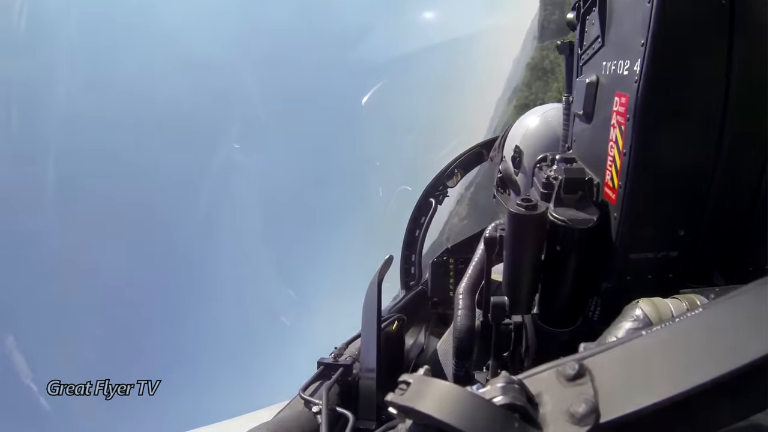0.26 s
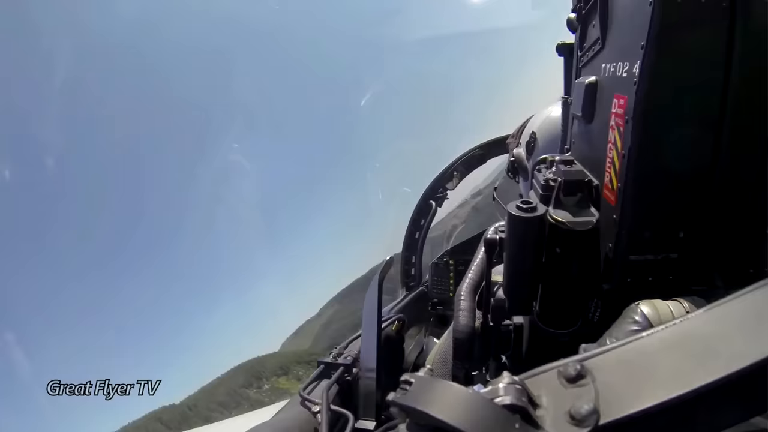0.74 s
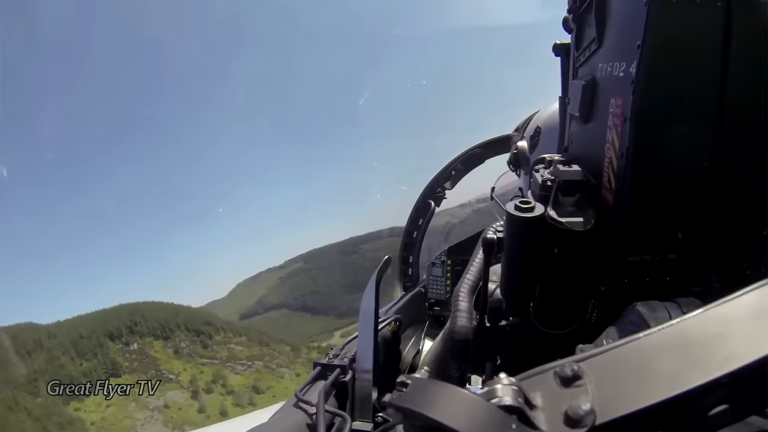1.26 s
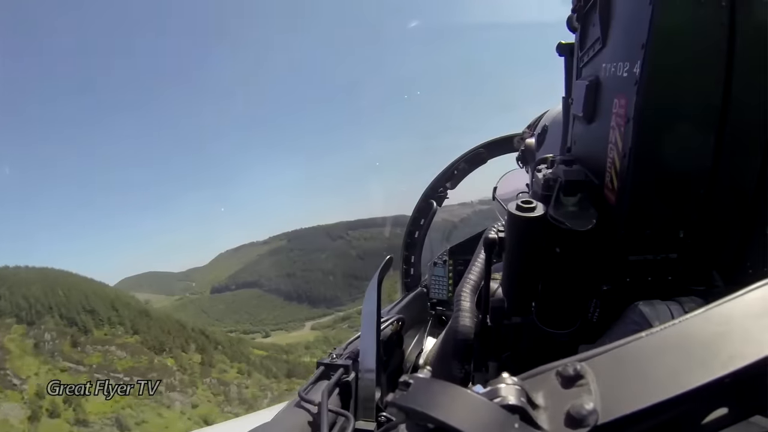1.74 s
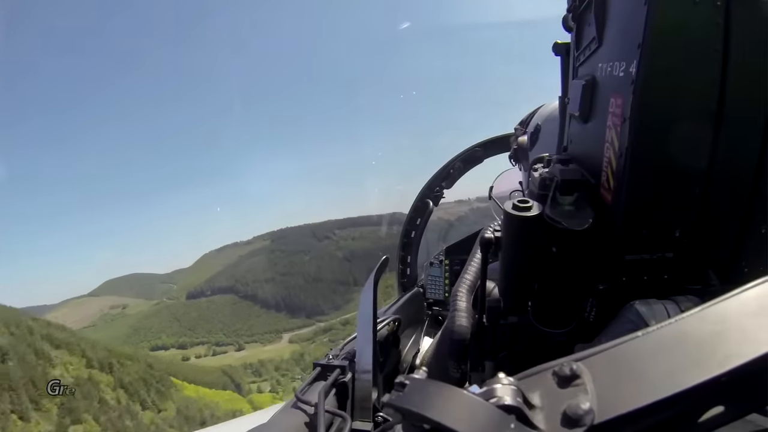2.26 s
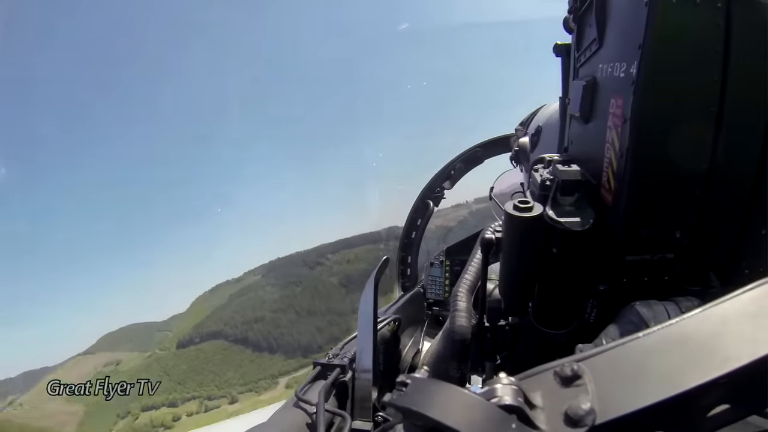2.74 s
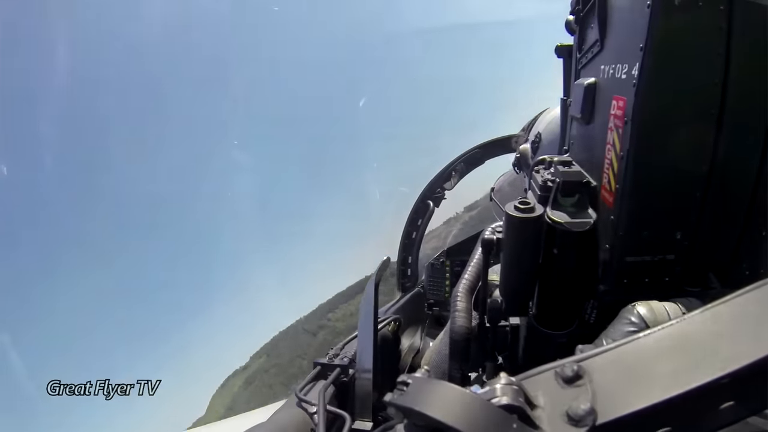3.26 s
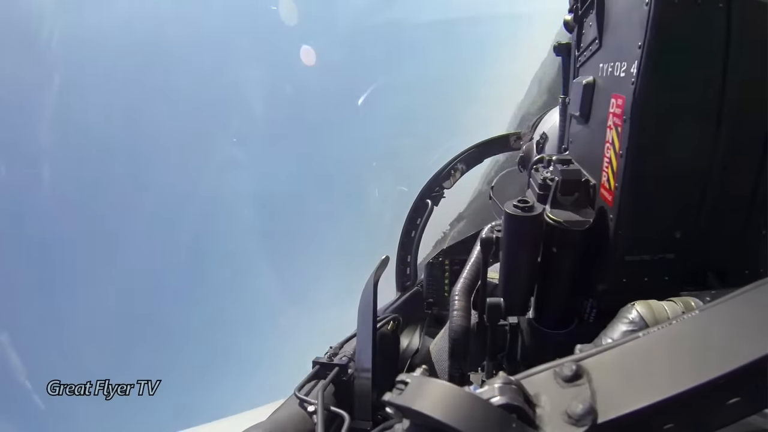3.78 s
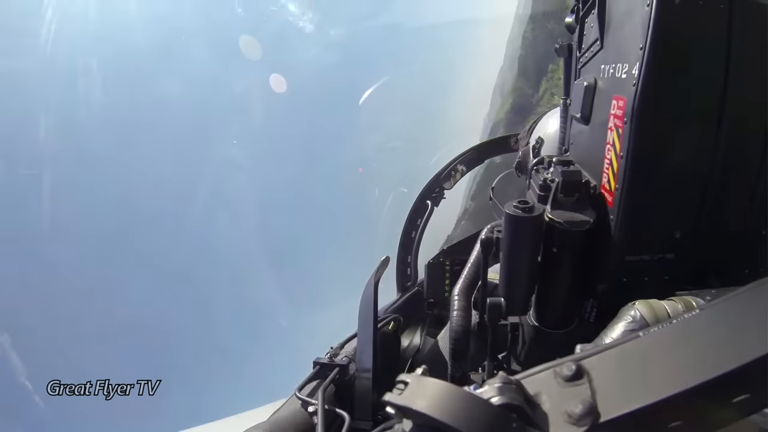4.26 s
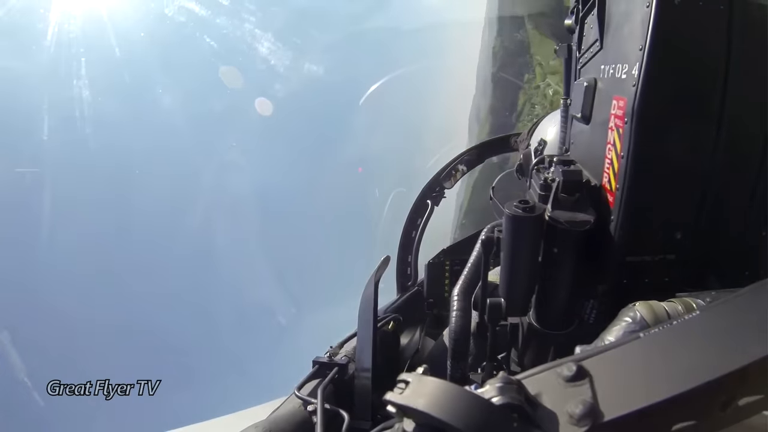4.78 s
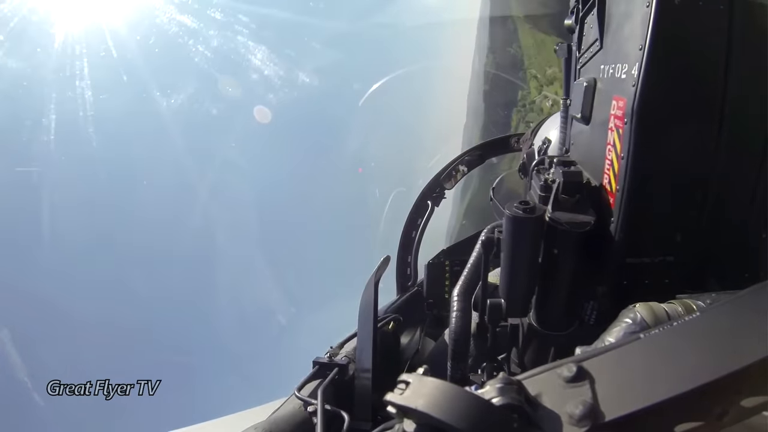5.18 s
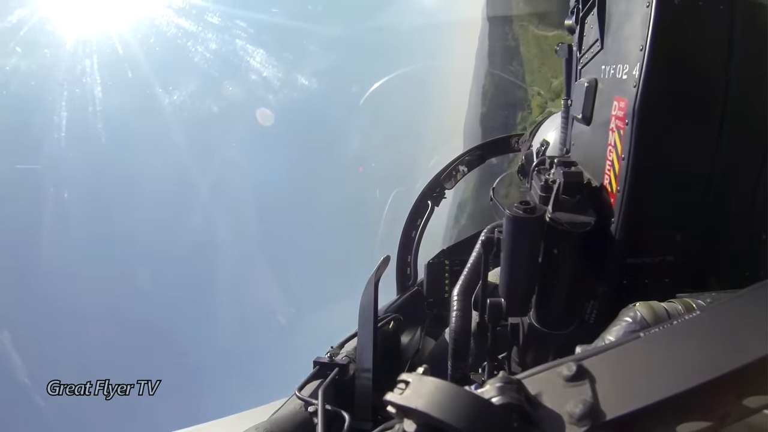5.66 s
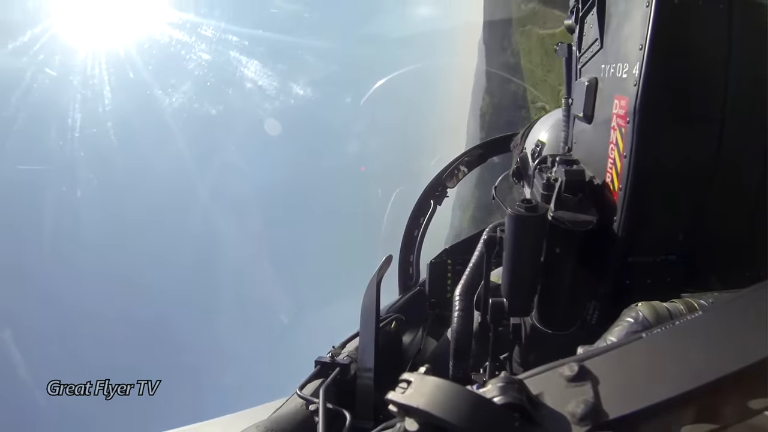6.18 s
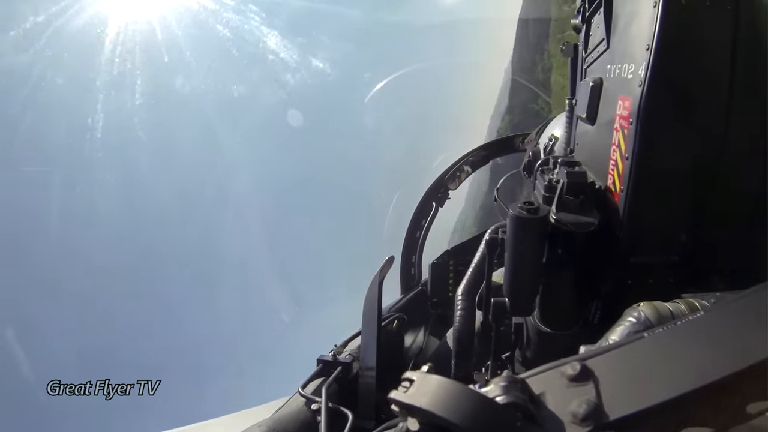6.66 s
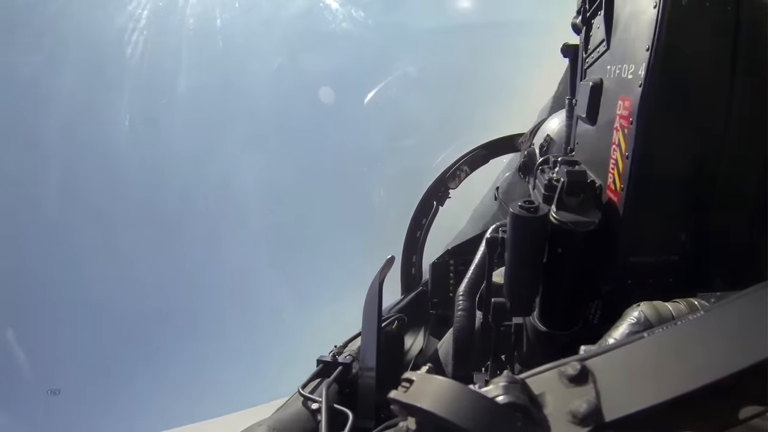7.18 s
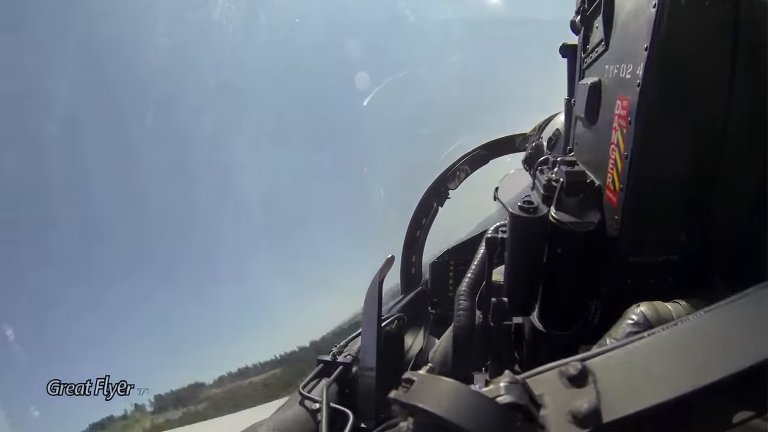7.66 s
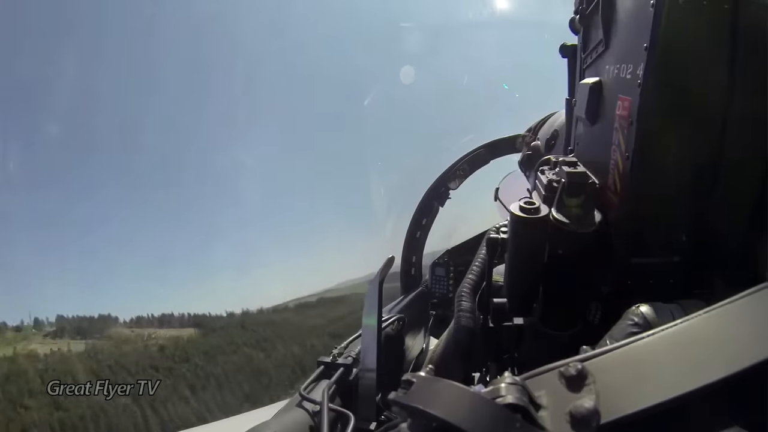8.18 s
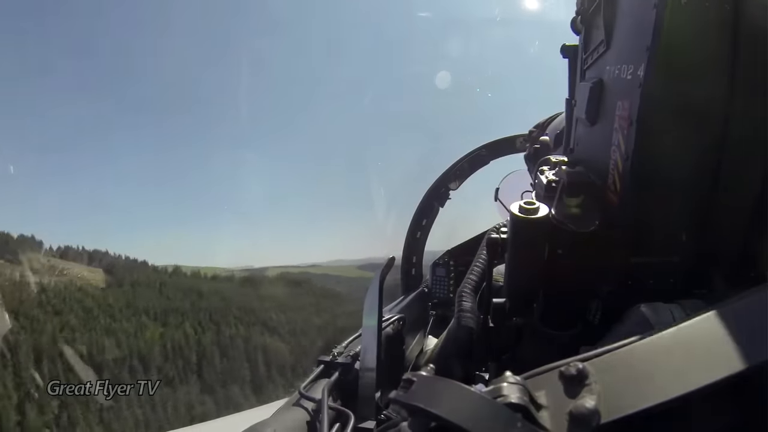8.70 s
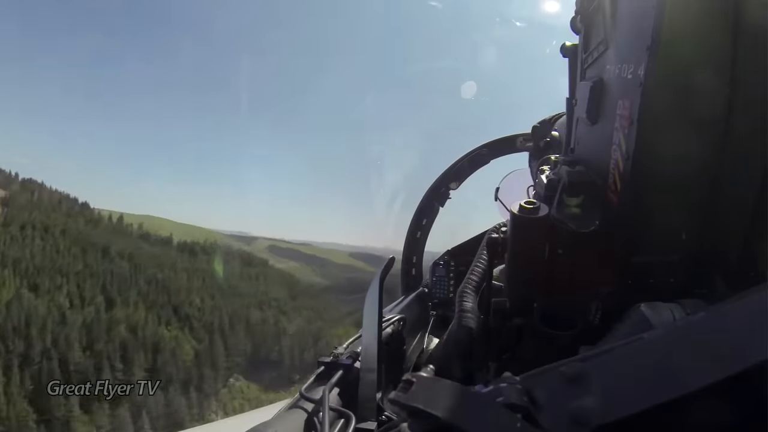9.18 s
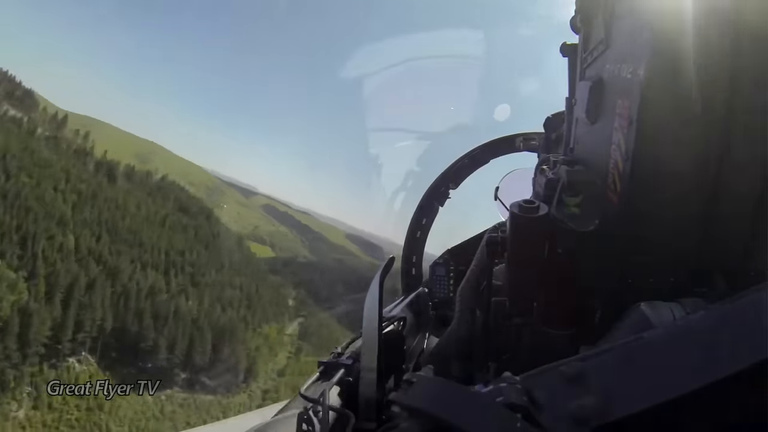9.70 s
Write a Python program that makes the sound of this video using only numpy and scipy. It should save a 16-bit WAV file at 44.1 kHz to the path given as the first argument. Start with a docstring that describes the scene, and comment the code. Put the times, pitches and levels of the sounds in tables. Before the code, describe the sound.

Continuous low, booming airframe shake and roaring, hissing air in a fighter cockpit, with dense dull knocks early on and only a few later jolts.

```python
"""Closed cockpit of a low-flying jet fighter

Engine and buffeting shake the airframe: filtered noise drones, shakes and booms, and single gusts jolt it.
Air roars and hisses over the canopy as coloured noise; a vent sings in narrow bands and thin turbine whines sit on top.
A shaken mount thumps, cracks and rebounds under humps of force, and rings when it knocks against a hard stop.
A limiter ducks the whole sound under the heaviest blows and gusts."""
import sys
import numpy as np
from scipy import signal
from scipy.fft import rfft, irfft, next_fast_len
from scipy.io import wavfile
from scipy.ndimage import uniform_filter1d, minimum_filter1d, map_coordinates

SR = 44100
rng = np.random.default_rng(int(sys.argv[2]) if len(sys.argv) > 2 else 0)


def dump(signal):
    """Clip the signal to [-1, 1] and save it as 16-bit WAV at the path in sys.argv[1]."""
    limited = np.clip(np.atleast_2d(signal).T, -1, 1)
    pcm = np.round(limited * 32767).astype(np.int16)
    wavfile.write(sys.argv[1], SR, pcm)


N = 438354
TIME = np.arange(N) / SR  # s


def from_db(db):
    """Decibels are a logarithmic measure of amplitude: 20 dB is a factor of ten."""
    return 10 ** (np.asarray(db) / 20)


def rms_one(x):
    """Signal strength is the root of the mean square; here it is scaled to 1."""
    return x / np.sqrt(np.mean(x ** 2) + 1e-20)


def in_time(rows):
    """Piecewise linear interpolation: each column after the time is joined by straight lines."""
    times_s, *columns = np.transpose(rows)
    return [np.interp(TIME, times_s, column) for column in columns]


def drift(rate_hz):
    """Random fluctuation of rms 1: white noise smoothed by a double real pole at rate_hz."""
    step = 40  # samples between computed points
    pole = np.exp(-2 * np.pi * rate_hz * step / SR)
    settling = 2000  # points dropped while the filter settles
    white = rng.standard_normal(N // step + settling + 2)
    slow = signal.lfilter([1], [1, -2 * pole, pole * pole], white)[settling:]
    return np.interp(np.arange(N) / step, np.arange(len(slow)), rms_one(slow))


def noise(spectrum, resonances=(), ripple_db=0):
    """Spectral shaping: white noise takes a broad colour, resonance peaks and a fine ripple; rms 1."""
    size = next_fast_len(N)
    hz = np.maximum(np.arange(size // 2 + 1) * SR / size, 1)
    points_hz, levels_db = np.transpose(spectrum)
    db = np.interp(np.log(hz), np.log(points_hz), levels_db)
    # Beyond the end points the colour falls by 24 dB per octave.
    db -= 24 * np.abs(np.log2(hz / np.clip(hz, points_hz[0], points_hz[-1])))
    for centre_hz, width_hz, lift_db in resonances:
        db += lift_db / (1 + (2 * (hz - centre_hz) / width_hz) ** 2)
    ripple_hz = np.geomspace(400, 14000, 420)
    db += ripple_db * np.interp(hz, ripple_hz, rng.standard_normal(len(ripple_hz)))
    white = rfft(rng.standard_normal(size))
    return rms_one(irfft(white * from_db(db), size)[:N])


def evened(x, span_s):
    """Envelope normalisation: dividing by the local rms removes slow swells and leaves fast lumps."""
    local_power = uniform_filter1d(x ** 2, max(int(span_s * SR), 1))
    return x / np.sqrt(local_power + 1e-6)


def swayed(x):
    """Time warping: an uneven reading speed moves all resonances of a noise up and down together."""
    sway = 0.008 * drift(1.2)  # spread as a share of the pitch
    position = np.arange(N) + np.cumsum(sway - sway.mean())
    return map_coordinates(x, [position], order=3, mode="mirror")


def narrow_band(centre_hz, spread_hz):
    """Quadrature modulation: two random envelopes smear a tone into a narrow band; rms 1."""
    phase = 2 * np.pi * np.cumsum(centre_hz * np.ones(N)) / SR
    return rms_one(drift(spread_hz) * np.cos(phase) + drift(spread_hz) * np.sin(phase))


def wavering(centre_hz, jitter_hz):
    """Frequency modulation: a tone of even strength has a randomly trembling pitch; rms 1."""
    pitch_hz = centre_hz + jitter_hz * drift(30)
    return rms_one(np.sin(2 * np.pi * np.cumsum(pitch_hz) / SR))


def ring(force, hz, t60_s):
    """Damped resonator: a unit click starts a decaying sine that falls 60 dB in t60_s."""
    decay = from_db(-60 / (t60_s * SR))
    angle = 2 * np.pi * hz / SR
    return signal.lfilter([0, np.sin(angle)], [1, -2 * decay * np.cos(angle), decay ** 2], force + 1e-18)


def pushes(rows, flatness):
    """Contact pulses: one smooth hump of force each; a flatter top has steeper flanks and more treble."""
    force = np.zeros(N)
    for peak_s, push_db, half_width_ms in rows:
        near = slice(max(int((peak_s - .01) * SR), 0), int((peak_s + .01) * SR))
        offset = np.abs((TIME[near] - peak_s) * 1000 / half_width_ms)
        force[near] += from_db(push_db) * np.exp(-offset ** flatness)
    return force


def sprung(force, corner_hz):
    """Elastic restoring: a first-order high-pass makes the motion spring back after each push."""
    return signal.sosfilt(signal.butter(1, corner_hz, "high", fs=SR, output="sos"), force)


def snap(spectrum):
    """Minimum phase: folding the cepstrum gives the most sudden click of this colour; energy 1."""
    size = 1024
    points_hz, levels_db = np.transpose(spectrum)
    hz = np.maximum(np.arange(size // 2 + 1) * SR / size, 1)
    db = np.interp(np.log(hz), np.log(points_hz), levels_db)
    cepstrum = irfft(np.log(from_db(db)))
    cepstrum[1:size // 2] *= 2
    click = irfft(np.exp(rfft(cepstrum[:size // 2], size)))
    return click / np.sqrt(np.sum(click ** 2))


def turbine(roar_db):
    """Rotating machinery radiates tones: thin whines, slightly unsteady in pitch, follow the roar."""
    # Turbine whine: start_s, pitch_hz, level_db (against 1.5 dB above the roar)
    whine_path = [(0, 8700, -47), (1, 8790, -41), (2, 8803, -43), (3.2, 8790, -43), (4.5, 8765, -44),
                  (5.7, 8730, -41), (6.6, 8700, -43), (7.8, 8675, -47), (9.2, 8655, -44), (9.94, 8660, -47)]
    # Steady accessory whines: pitch_hz, level_db (same reference)
    accessory_tones = [(8398, -52.5), (9115, -46)]
    pitch_hz, level_db = in_time(whine_path)
    whine = from_db(level_db) * wavering(pitch_hz, jitter_hz=8)
    accessories = sum(from_db(db) * wavering(hz, jitter_hz=8) for hz, db in accessory_tones)
    return from_db(roar_db + 1.5) * (whine + accessories)


def vent():
    """Jet tones: cabin air sings in two narrow bands, and late on a thin broken whistle climbs out."""
    # Main band of the jet: start_s, level_db, pitch_hz
    song_path = [(0, -54, 3310), (.8, -55, 3275), (1.5, -68, 3330), (6.1, -72, 3300), (6.4, -51.5, 3250),
                 (7.9, -47.5, 3254), (8.1, -56, 3220), (8.4, -45, 3216), (8.9, -54.5, 3264),
                 (9.3, -48.5, 3250), (9.8, -52, 3350), (9.94, -47, 3320)]
    # Climbing whistle: start_s, level_db, pitch_hz
    whistle_path = [(8.55, -70, 3250), (8.8, -55, 3270), (9.05, -52, 3300), (9.2, -47, 3335),
                    (9.42, -51, 3416), (9.55, -48, 3450), (9.7, -53, 3490), (9.8, -49, 3445),
                    (9.94, -60, 3480)]
    song_db, song_hz = in_time(song_path)
    whistle_db, whistle_hz = in_time(whistle_path)
    upper_band = from_db(-14) * narrow_band(4940, spread_hz=95)
    song = narrow_band(song_hz, spread_hz=160) + upper_band
    whistle = wavering(whistle_hz, jitter_hz=22.06)
    return from_db(song_db + drift(7.4)) * song + from_db(whistle_db + 2.5 * drift(12)) * whistle


def engine(roar_db):
    """Structure-borne sound: a rough drone follows the roar, with a hollow resonance of wandering pitch."""
    # Drone level: start_s, level_db (against the roar)
    drone_levels = [(0, 5), (.8, -3), (1.6, 1), (2.2, -3), (3.3, -2.5), (4.2, -2), (5.2, -3), (5.8, 1.5),
                    (6.5, -2.5), (7.3, -4.5), (9.94, -3.5)]
    # Drone spectrum: frequency_hz, density_db (relative, per Hz)
    drone_spectrum = [(110, -26), (165, 13), (200, 3), (235, 0.5), (290, -3), (345, -1.5), (420, -3.5),
                      (470, -15.5), (600, -13), (900, -51)]
    # Hollow resonance: start_s, level_db, pitch_hz
    hollow_path = [(0, -37, 407.4), (1.2, -48.5, 405), (2.8, -44.5, 407.8), (3.5, -37.5, 405),
                   (4.4, -36, 394.7), (5.2, -37, 372), (6.1, -37.5, 397.5), (7.0, -42.5, 393.7),
                   (7.6, -39, 419), (8.2, -56, 414), (9.5, -41.5, 412), (9.94, -42, 424)]
    drone_db, = in_time(drone_levels)
    hollow_db, hollow_hz = in_time(hollow_path)
    drone = from_db(roar_db + drone_db + 2.25 * drift(5.1)) * noise(drone_spectrum)
    return drone + from_db(hollow_db) * narrow_band(hollow_hz, spread_hz=41.5)


def slipstream(roar_db, flutter_db):
    """Turbulent flow noise: eddies make roar and hiss flutter together, and air whistles at the canopy."""
    # Spectra of roar and hiss: frequency_hz, density_db (relative, per Hz)
    roar_spectrum = [(200, -36), (480, -5), (660, -6), (900, -4), (1020, -1), (1200, -1.5), (1500, -3.5),
                     (1700, -5.5), (1860, -8), (1980, -19), (2300, -26), (3500, -53)]
    hiss_spectrum = [(1500, -5.5), (2050, 2.5), (2900, -1.5), (3600, 1), (4000, -5), (4800, -8),
                     (5700, -10), (6150, -17.5), (7200, -13.5), (8000, -21.5), (9200, -15.5),
                     (10200, -25.5), (11400, -24), (13800, -43)]
    # Resonances of canopy and cabin: centre_hz, width_hz, lift_db
    cabin_modes = [(719, 33, 6), (782, 67, 5), (1024, 18, 6.5), (1076, 50, 5.5), (1163, 59, 5.5),
                   (1393, 81, 5.5), (1600, 37, 2.5), (1827, 80, 3.5), (2277, 160, 4), (2617, 78, 9),
                   (2960, 240, 5), (3820, 62, 5), (4320, 150, 4.5), (5020, 100, 3.5), (5060, 160, 2),
                   (6800, 220, 4), (11070, 400, 3)]
    # Hiss level: start_s, level_db (against the roar)
    hiss_levels = [(0, -13), (1.2, -14), (2.45, -13), (2.75, -13), (3.4, -14), (4.6, -14), (6.1, -12.5),
                   (7.5, -15), (9.94, -14)]
    # Faint canopy whistle: start_s, level_db, pitch_hz
    canopy_path = [(4.2, -77, 1790), (4.8, -51, 1790), (5.5, -45, 1850), (6.1, -52, 1830), (6.6, -50, 1825),
                   (7.4, -44, 1800), (8.0, -68, 1790)]
    eddies_db = flutter_db * drift(13.6)
    hiss_db, = in_time(hiss_levels)
    whistle_db, whistle_hz = in_time(canopy_path)
    roar = swayed(noise(roar_spectrum, cabin_modes, ripple_db=1.0))
    roar *= from_db(roar_db + eddies_db + .5 * drift(27))
    hiss = noise(hiss_spectrum, cabin_modes, ripple_db=1.6)
    hiss *= from_db(roar_db + hiss_db + 1.5 * eddies_db)
    return roar + hiss + from_db(whistle_db) * narrow_band(whistle_hz, spread_hz=8.5)


def airframe():
    """Forced vibration: buffeting shakes the structure, two cabin air resonances boom and gusts jolt it."""
    # Deep shake: start_s, level_db
    shake_levels = [(0, -17.5), (.6, -16.5), (1.1, -20), (1.85, -16.5), (2.45, -19.5), (2.72, -25.5),
                    (3.1, -20.5), (3.3, -24), (3.6, -18), (4.3, -16.5), (5.2, -17.5), (6.3, -17.5),
                    (7.2, -17.5), (7.6, -15), (8.2, -18.5), (8.75, -17), (9.1, -18), (9.94, -17.5)]
    # Swells of the cabin air: start_s, level_db
    boom_levels = [(0, -24), (.45, -20.5), (.95, -29.5), (1.15, -23.5), (1.35, -28), (1.5, -20.5),
                   (1.62, -27), (1.8, -16.5), (2.05, -27), (2.2, -22), (2.35, -29), (2.5, -21), (2.75, -31),
                   (3.2, -24), (3.58, -19), (3.8, -25), (4.4, -22.5), (4.85, -20), (5.4, -19.5),
                   (5.62, -20), (5.8, -21.5), (6.15, -17.5), (6.6, -20.5), (7.0, -22.5), (7.25, -19),
                   (7.6, -22.5), (7.8, -20), (8.25, -25), (8.55, -18), (8.95, -25), (9.28, -16.5),
                   (9.41, -22), (9.52, -16.5), (9.7, -18.5), (9.94, -22.5)]
    # Lower cabin resonance: start_s, level_db (against the boom)
    low_levels = [(0, -5), (1.0, -0.5), (1.5, -5), (2.4, -5), (3.3, -1.5), (4.2, -3), (5.5, -2.5),
                  (6.6, -9.5), (7.6, -3), (8.4, -2), (9.2, -9.5), (9.94, -3)]
    # Spectra of shake, boom and lower boom: frequency_hz, density_db (relative, per Hz)
    shake_spectrum = [(8, -35.5), (15, -23), (22, 1), (30, -10.5), (36, -1.5), (43, -4), (52, -7.5),
                      (64, -36.5), (85, -27)]
    boom_spectrum = [(88, -14.5), (105, -0.5), (120, 0.5), (133, -0.5), (147, -5), (156, -14), (178, -24),
                     (220, -27)]
    low_spectrum = [(55, -30.5), (68, 0.5), (77, -1), (89, 1.5), (102, -13.5)]
    # Gusts: peak_s, push_db
    gusts = [(0.365, -10), (5.898, 1), (6.234, 2), (6.298, -3), (6.648, -1.5), (6.739, -1), (7.724, -1.5)]
    shake_db, = in_time(shake_levels)
    boom_db, = in_time(boom_levels)
    low_db, = in_time(low_levels)
    shake = from_db(shake_db) * evened(noise(shake_spectrum), span_s=0.072)
    air = evened(noise(boom_spectrum), span_s=0.19)
    air += from_db(low_db) * evened(noise(low_spectrum), span_s=0.22)
    boom = from_db(boom_db + 0.79 * drift(12.0)) * air
    jolt_half_width_ms = 3.1
    jolts = pushes([(s, db, jolt_half_width_ms) for s, db in gusts], flatness=1.23)
    return shake + boom - sprung(jolts, corner_hz=7.2)


def mount():
    """Impact excitation: soft pushes crack, thump and rebound; short opposite knocks ring all modes."""
    # Dull thumps: peak_s, push_db, half_width_ms, rebound_db (against the push), crack_db
    thumps = [(.02, -15.5, 0.64, -14, -34), (0.0629, 0, 1, -26, -28), (0.095, -10, 1, -14, -30),
              (0.1101, -1, 0.53, -6, -9), (0.2934, 0.5, 0.75, -12, -13), (0.3794, -4, 0.71, -9, -14),
              (0.4313, -3.5, 0.74, -25, -20), (0.4773, 7, 0.75, -19, -0.5), (0.5223, 2, 0.83, -22, -4.5),
              (0.5559, 5, 0.98, -30, -12), (0.5938, -10, 0.8, -10, -24), (0.7234, 0, 0.6, -8, -8.5),
              (0.7829, -5.5, 0.63, -7, -10), (0.815, 6.5, 0.85, -32, -7), (.857, -3.5, 0.57, -11, -11),
              (0.9125, 3, .78, -33, -7), (.917, -4, 0.62, -8, -21), (1.1103, -11, 0.73, -23, -30),
              (1.347, -12.5, 0.48, -16, -32), (1.595, 1, 0.59, -9, -6.5), (1.868, -11, 1, -14, -30),
              (2.162, -10, 0.98, -14, -30), (2.284, -10, 1, -12, -22), (2.308, -8, .7, -15, -24),
              (2.318, -14, 0.62, -12, -24), (2.487, -17, 0.88, -12, -30), (2.572, -10, 0.6, -14, -24),
              (3.129, -13, 0.98, -9, -30), (3.491, -11.5, 0.54, -14, -26), (4.955, -16, 0.67, -14, -30),
              (6.3586, -5, 0.92, -16, -24), (6.435, -12, 0.66, -21, -26), (7.8138, -2, 0.49, 1.5, -8)]
    # Knocks against the stop: peak_s, push_db, half_width_ms
    knocks = [(1.1086, -9, .08), (1.3007, 0.5, 0.14), (1.787, -9, 0.51), (1.7879, -9, 0.067),
              (2.28, -1.5, 0.31), (2.3713, 4, 0.18), (2.6001, 18, 0.051), (6.2156, 3.5, 0.11)]
    # Modes of the mount: pitch_hz, level_db, t60_s
    mount_modes = [(457, -26.5, 0.01), (808, -32.5, 0.014), (1158, -30.5, 0.028), (1477, -43, 0.017),
                   (1720, -37.5, 0.024), (2400, -48, 0.01), (2900, -37.5, 0.01), (3400, -41, 0.0054)]
    # Crack of a contact: frequency_hz, density_db (relative, per Hz)
    crack_spectrum = [(600, -7), (1300, 8), (2200, 1), (3400, -1), (4200, -15), (5500, -18), (7000, -29),
                      (12000, -39), (15000, -55)]
    rebound_delay_s, rebound_half_width_ms = 0.0016, 0.79
    soft = pushes([(s, db, ms) for s, db, ms, back, crack in thumps], flatness=1.65)
    rebounds = [(s + rebound_delay_s, db + back, rebound_half_width_ms)
                for s, db, ms, back, crack in thumps]
    soft -= pushes(rebounds, flatness=2)
    hard = pushes(knocks, flatness=1.3)
    # A soft push barely rings the mount; a knock is heard only through the ringing.
    striking = from_db(-21.5) * soft - hard
    rings = sum(from_db(db) * ring(striking, hz, t60_s) for hz, db, t60_s in mount_modes)
    touches = np.zeros(N)
    for peak_s, push_db, half_width_ms, back_db, crack_db in thumps:
        # Contact begins one half-width ahead of the peak.
        touches[int((peak_s - half_width_ms / 1000) * SR)] = from_db(crack_db)
    cracks = signal.oaconvolve(touches, snap(crack_spectrum))[:N]
    return sprung(soft + rings, corner_hz=70) + cracks


def scene():
    """Superposition: roar, hiss, drone and turbine share the airflow level; the other sources add to them."""
    # Roar of the air over the canopy: start_s, level_db
    airflow_levels = [(0, -32), (.7, -34.5), (1.1, -33.5), (1.9, -31.5), (2.45, -29.5), (2.8, -34.5),
                      (3.4, -28.5), (4.2, -26.5), (4.9, -29), (6.1, -30.5), (6.45, -35.5), (7.2, -30),
                      (7.9, -31), (8.5, -31), (8.9, -31), (9.4, -30.5), (9.94, -32)]
    roar_db, = in_time(airflow_levels)
    flight = turbine(roar_db) + vent() + engine(roar_db) + slipstream(roar_db, flutter_db=0.51)
    return (flight + airframe() + mount())[None]


def limiter(x):
    """Dynamic range control: gain ducks just ahead of each peak and creeps back evenly in dB."""
    limit_db, release_db_per_s = -6, 28
    detector_s, attack_s = 0.0016, 0.0028
    power = uniform_filter1d(x ** 2, max(int(detector_s * SR), 1))
    over_db = np.maximum(10 * np.log10(np.maximum(power, 1e-12)) - limit_db, 0)
    released_db = release_db_per_s * TIME
    # The running maximum holds the strongest excess, less what has been released since.
    gain_db = released_db - np.maximum.accumulate(over_db + released_db, axis=-1)
    attack = max(int(attack_s * SR), 1)
    # A centred minimum brings the duck forward; a running mean slopes its edges.
    return x * from_db(uniform_filter1d(minimum_filter1d(gain_db, attack), attack))


def record(dry):
    """Limiting, saturation and band limiting: blows duck all, peaks round off, the top is cut."""
    fade_in_s, cutoff_hz = .006, 15700
    limited = limiter(dry) * np.minimum(TIME / fade_in_s, 1)
    rounded = limited / (1 + limited ** 8) ** (1 / 8)  # never passes full scale
    # From cutoff_hz upward the filter takes away at least 70 dB.
    return signal.sosfilt(signal.cheby2(12, 70, cutoff_hz, fs=SR, output="sos"), rounded)


dry = scene()
out = record(dry)
dump(out)
```